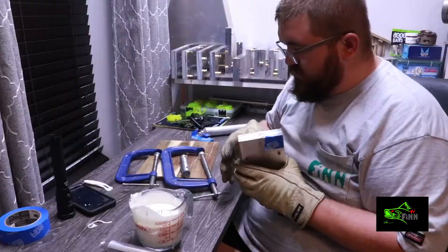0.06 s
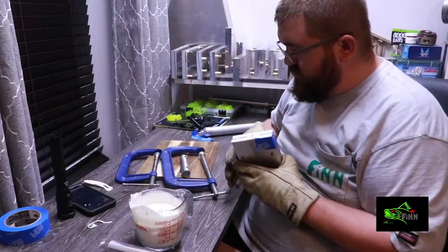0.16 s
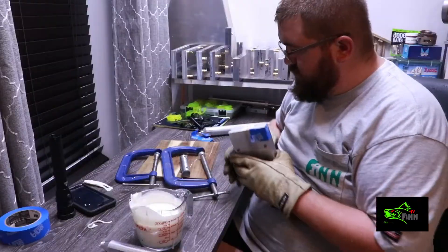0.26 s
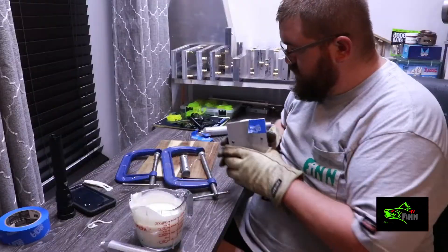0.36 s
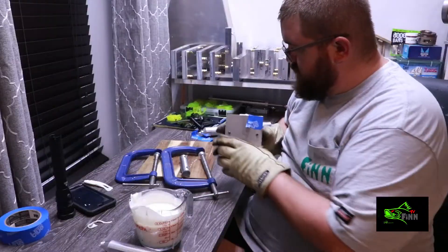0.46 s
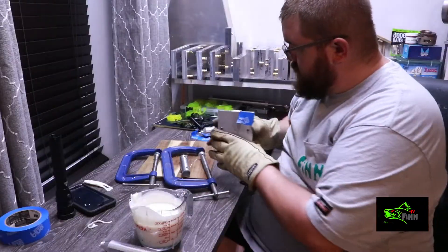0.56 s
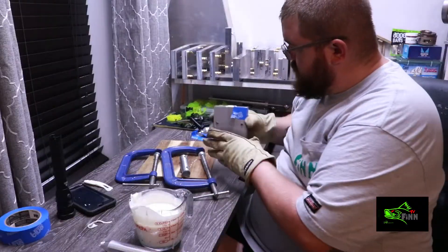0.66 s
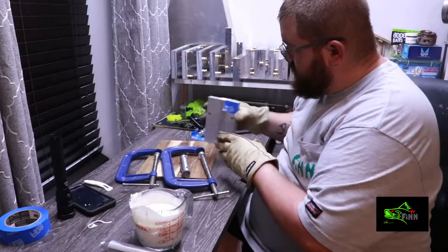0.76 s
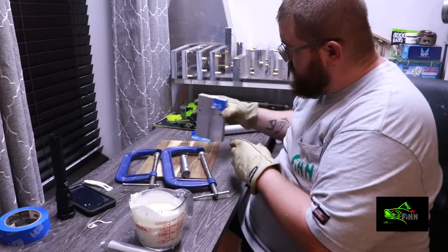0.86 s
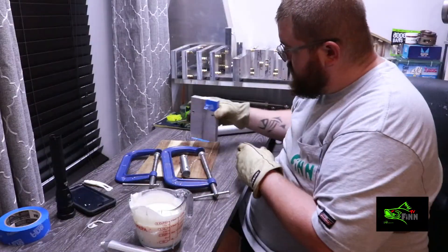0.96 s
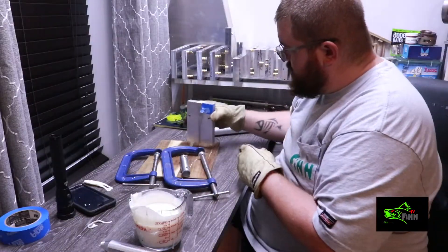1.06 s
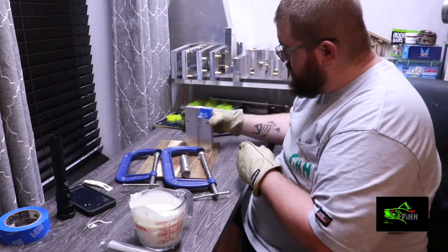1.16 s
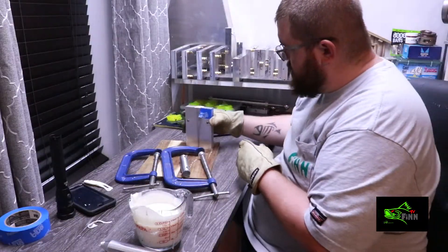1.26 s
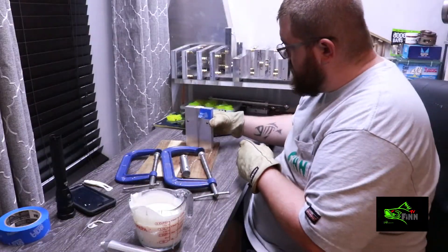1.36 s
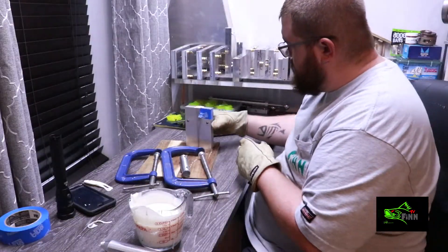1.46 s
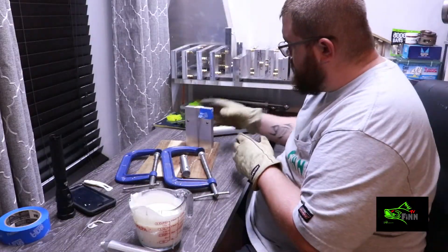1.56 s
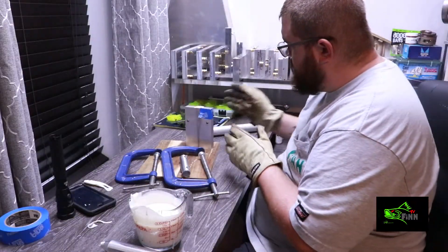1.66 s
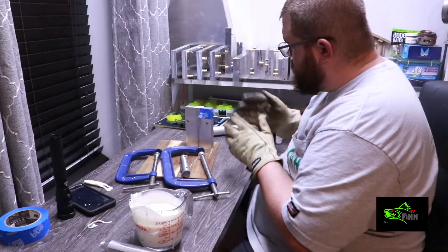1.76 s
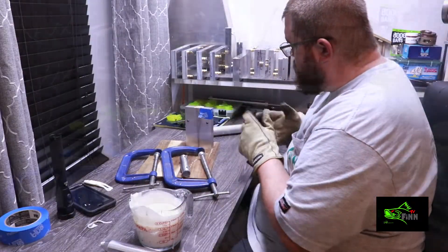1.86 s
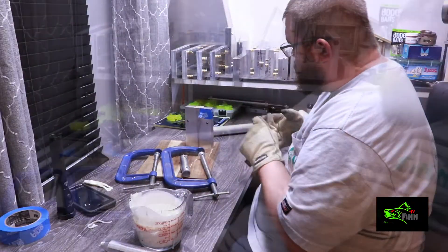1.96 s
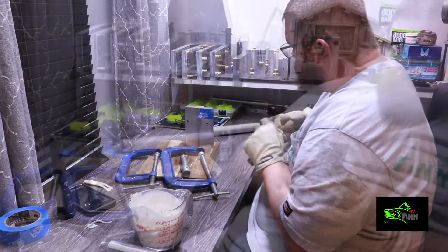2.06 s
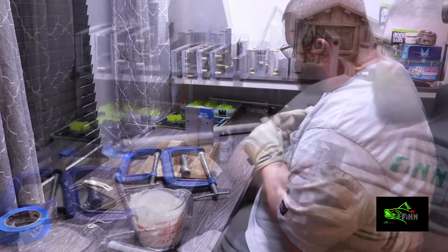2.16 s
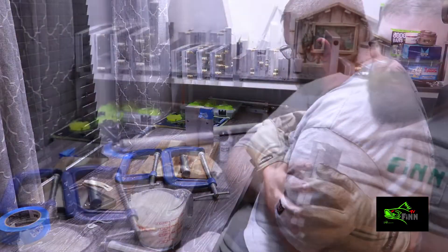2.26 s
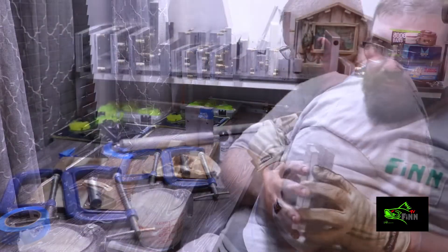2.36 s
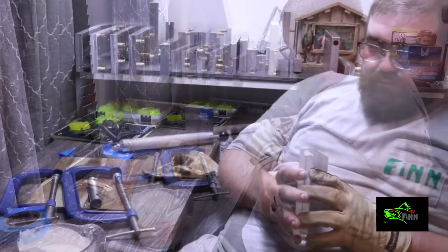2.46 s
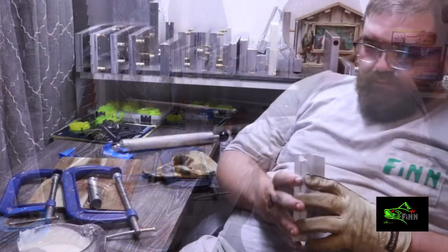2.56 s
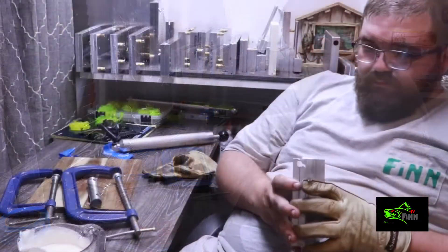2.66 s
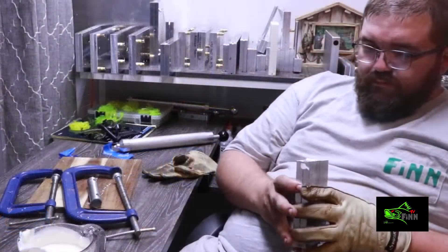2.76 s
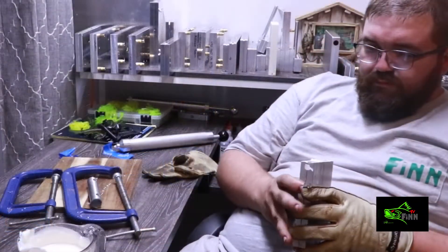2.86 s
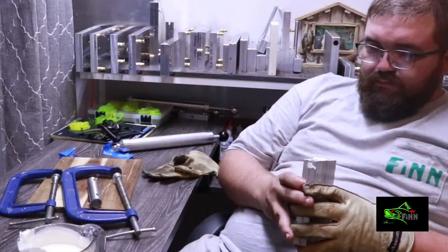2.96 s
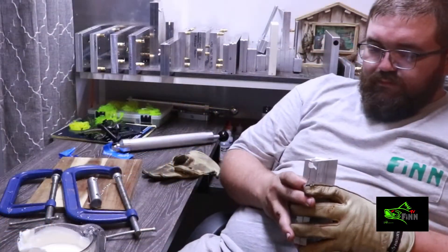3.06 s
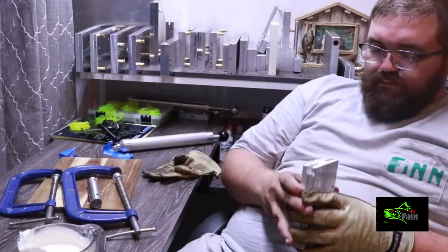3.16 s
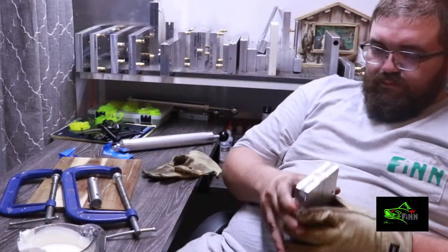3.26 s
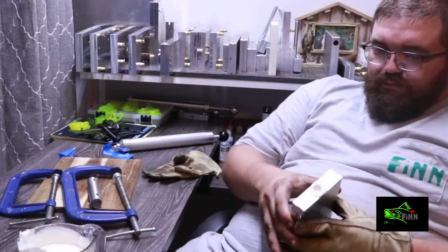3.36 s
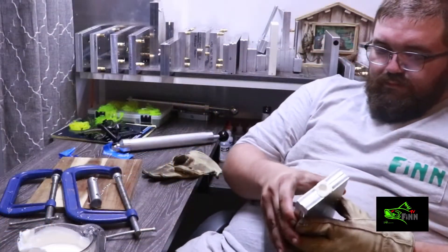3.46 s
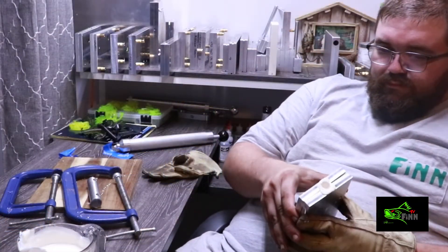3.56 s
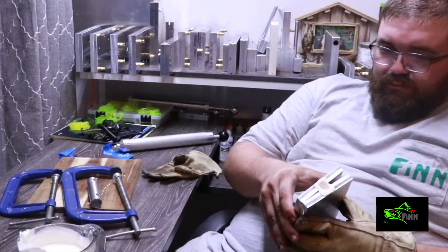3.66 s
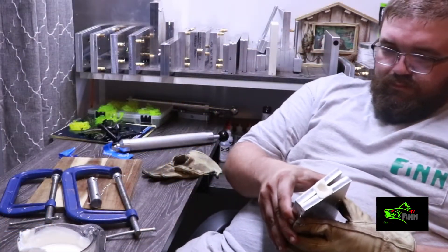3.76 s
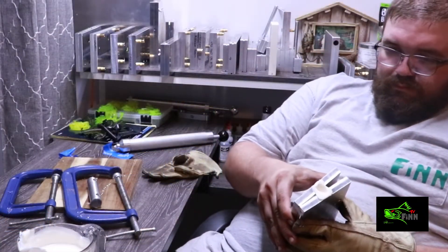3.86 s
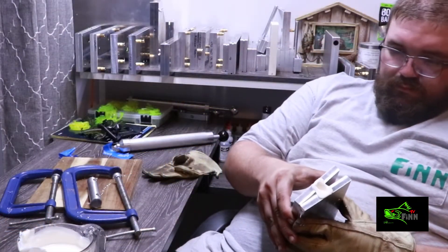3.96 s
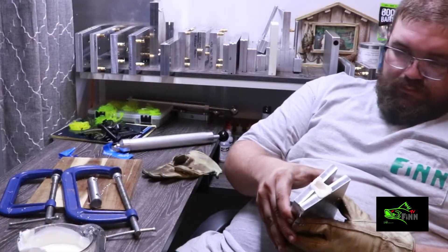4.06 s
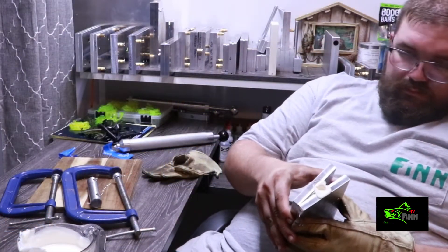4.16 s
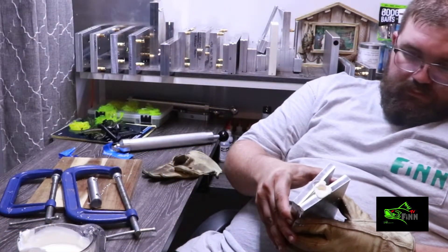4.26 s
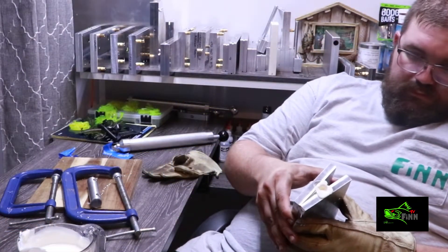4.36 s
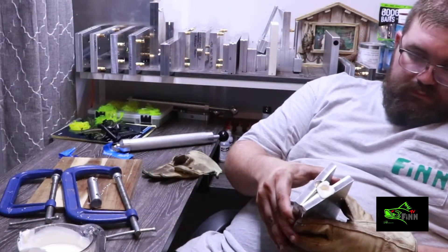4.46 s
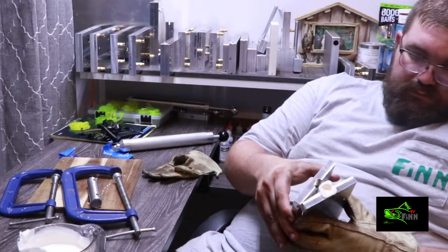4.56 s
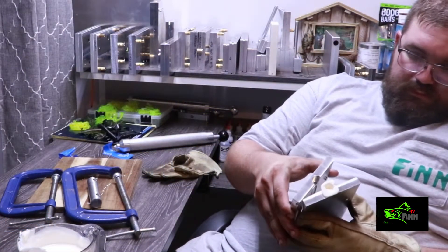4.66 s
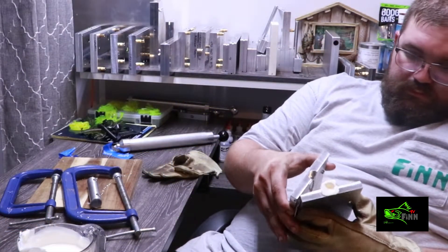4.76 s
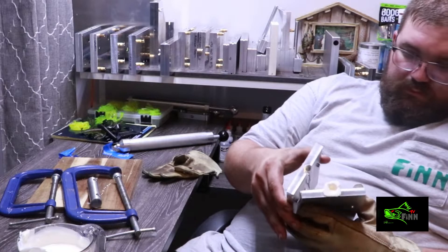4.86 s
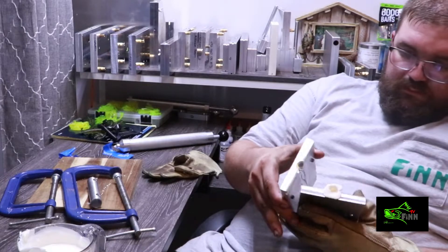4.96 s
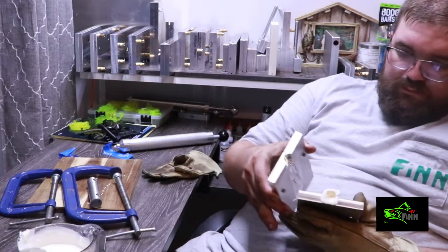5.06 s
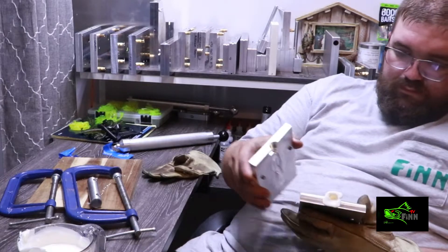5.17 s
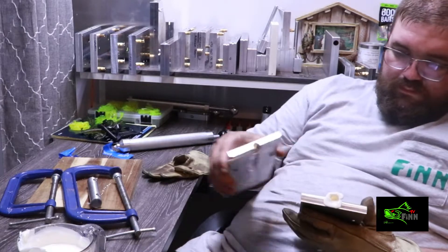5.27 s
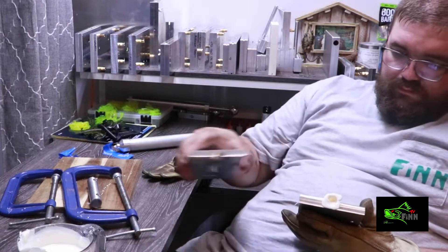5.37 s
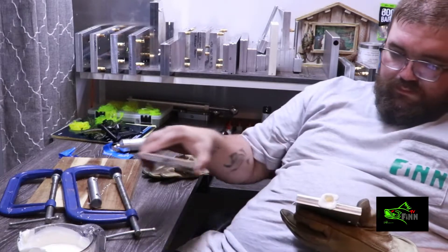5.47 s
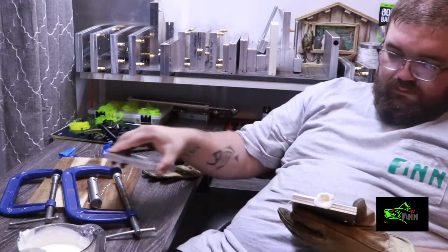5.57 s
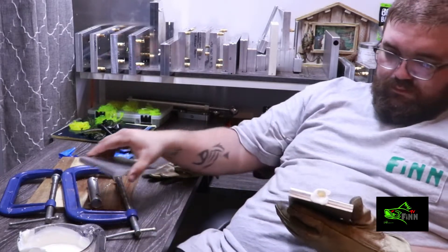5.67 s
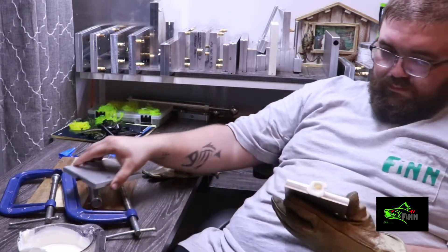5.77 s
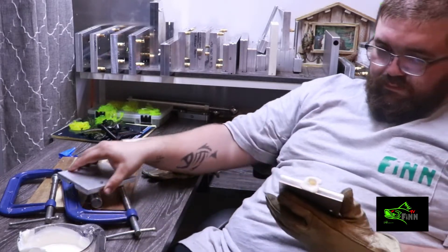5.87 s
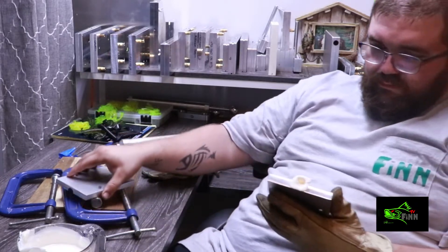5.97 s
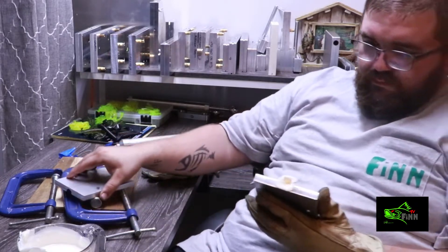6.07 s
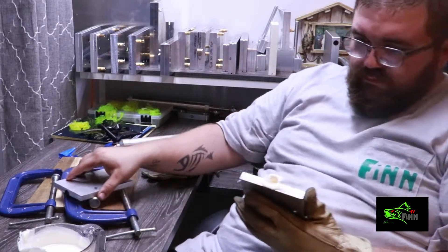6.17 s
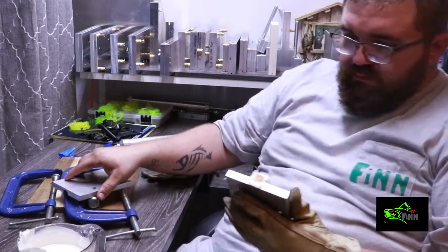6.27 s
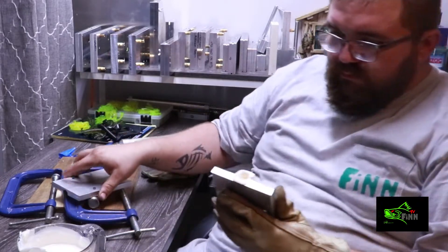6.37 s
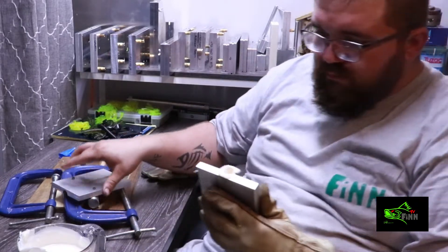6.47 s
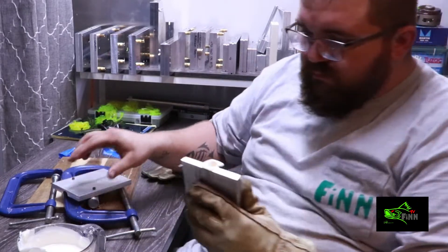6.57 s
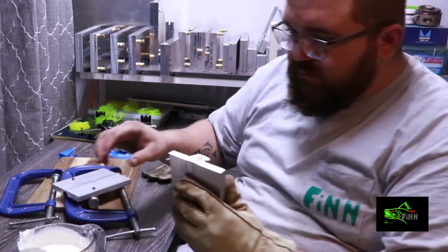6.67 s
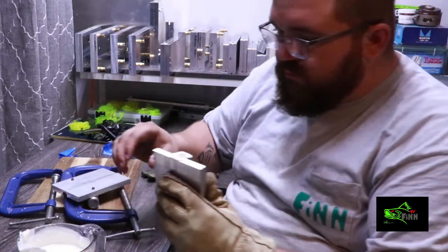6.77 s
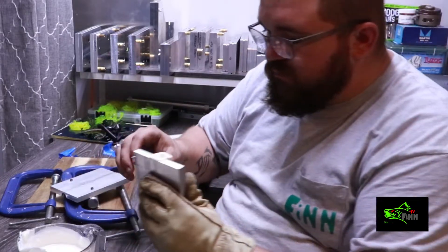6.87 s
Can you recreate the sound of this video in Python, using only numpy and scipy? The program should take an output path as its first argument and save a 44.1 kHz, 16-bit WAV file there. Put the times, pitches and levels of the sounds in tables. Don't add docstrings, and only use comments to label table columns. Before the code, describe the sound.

Ventilation hum and hiss run throughout, with soft low rumbles as the bench shifts. Light taps lead to one hard, distorted wooden slap with a quick rattle, then leather friction from a glove coming off. Small metal ticks and slipping squeaks end in a crisp click. Finally an aluminium piece touches a clamp, lands with bright ringing, clatters again and gets a faint nudge. Close microphone, short room reverberation.

```python
import sys
import numpy as np
from scipy import signal
from scipy.fft import rfft, irfft, next_fast_len
from scipy.io import wavfile
from scipy.ndimage import uniform_filter1d, map_coordinates

SR = 44100
rng = np.random.default_rng(int(sys.argv[2]) if len(sys.argv) > 2 else 0)


def int16_out(signal):
    q = np.round(np.clip(np.atleast_2d(signal).T, -1, 1) * 32767)
    wavfile.write(sys.argv[1], SR, q.astype(np.int16))


def attenuation_scalar(level_db):
    decades = np.asarray(level_db, float) / 20
    return 10 ** decades


N = 305127
T = np.arange(SR // 3) / SR


def unit(x):
    return x / np.sqrt(np.mean(x ** 2) + 1e-20)


def along(points, hz):
    f, v = np.transpose(points)
    return np.interp(np.log(hz + 1), np.log(f + 1), v)


def wobble(rate):
    knots = rng.standard_normal(int(N / SR * 400) + 4)
    return map_coordinates(knots, [np.arange(N) * rate / SR])


def noise(gain, size):
    m = next_fast_len(size)
    spectrum = rfft(rng.standard_normal(m)) * gain(np.fft.rfftfreq(m, 1 / SR))
    return unit(irfft(spectrum, m)[:size])


def coloured(spectrum, size):
    return noise(lambda hz: attenuation_scalar(along(spectrum, hz)), size)


def resonant(peaks):
    def gain(f):
        return sum(attenuation_scalar(db) * np.abs(f * w / (c * c - f * f + 1j * f * w)) ** 2 for c, w, db in peaks)
    return noise(gain, N)


def gritty(spectrum):
    rate_hz, depth_db = 400, 2.5
    bursts = np.interp(T * rate_hz, np.arange(400), rng.standard_normal(400))
    return unit(coloured(spectrum, len(T)) * attenuation_scalar(depth_db * bursts))


def swells(rows, rest_db):
    middle, half_length, *columns = np.transpose(rows)[:, :, None]
    t = np.arange(0, N + 64, 64) / SR
    bell = np.exp(-2 * ((t - middle) / half_length) ** 2)
    curves = []
    for level_db, rest in zip(columns, rest_db):
        power = attenuation_scalar(2 * rest) + np.sum(attenuation_scalar(2 * level_db) * bell, axis=0)
        curves.append(np.interp(np.arange(N) / SR, t, np.sqrt(power)))
    return curves


def dying(t60, attack):
    return attenuation_scalar(-60 * T / t60) * (1 - np.exp(-T / attack))


def ring(modes, attack, rough, scatter_db, since=0):
    steady_hz = 900
    out = np.zeros(len(T))
    for hz, db, t60 in modes:
        knots = rng.standard_normal(200) + 1j * rng.standard_normal(200)
        waver = np.interp(T * 220, np.arange(200), knots)
        depth = rough * min(1, hz / steady_hz) ** 2
        tone = np.imag((1 + depth * waver) * np.exp(2j * np.pi * hz * (T + since)))
        out += attenuation_scalar(db + scatter_db * rng.normal()) * tone * dying(t60, attack)
    return out


def add(track, s, sound):
    track[round(s * SR):][:len(sound)] += sound


def shop(sound, wet_db):
    # (frequency [Hz], t60 [s])
    room_decay = [(100, 0.33), (500, 0.18), (3000, 0.21), (12000, 0.15)]
    hz, t, z = signal.stft(rng.standard_normal(len(T)), SR, nperseg=256)
    decay = attenuation_scalar(-60 * t / along(room_decay, hz)[:, None])
    tail = signal.istft(z * decay, SR, nperseg=256)[1]
    late = np.pad(tail / np.linalg.norm(tail), (round(.004 * SR), 0))
    return sound + attenuation_scalar(wet_db) * signal.fftconvolve(sound, late)[:len(T)]


def knock(contacts, modes, spectrum, noise_db, t60, wet_db, rough, attack):
    out = np.zeros(N + SR)
    for s, db in contacts:
        body = ring(modes, attack, rough, scatter_db=1.5, since=s - contacts[0][0])
        burst = attenuation_scalar(noise_db) * gritty(spectrum) * dying(t60, attack=0.00048)
        add(out, s, attenuation_scalar(db) * shop(body + burst, wet_db))
    return out[:N]


def air():
    # (frequency [Hz], level [dB per Hz])
    flow = [(29, -33), (50, -4), (148, -2.5), (193, -2), (239, 2.5), (297, 0), (387, -1.5), (447, -6),
            (543, -9.5), (900, -15.5), (1350, -21), (2860, -19), (4740, -21), (14700, -23), (15800, -29)]
    return attenuation_scalar(-54 + 0.67 * wobble(rate=2.5)) * coloured(flow, N)


def stand():
    # (frequency [Hz], level [dB per Hz])
    response = [(8, -26.5), (18, 7.5), (30, 3.5), (50, -4.5), (90, -26), (200, -62.5)]
    # (middle [s], half length [s], level [dB])
    lurches = [(0.07, 0.073, -49.5), (0.32, 0.028, -33.5), (0.4, 0.044, -41.5), (0.6, 0.18, -46.5),
               (0.83, 0.11, -44), (1.17, .04, -41.5), (1.3, .05, -47), (1.44, 0.076, -48),
               (1.95, 0.077, -51), (2.55, 0.041, -41), (2.75, 0.1, -40.5), (2.96, 0.043, -45),
               (3.07, 0.044, -37.5), (3.16, 0.068, -31.5), (3.3, 0.13, -47), (3.55, 0.11, -52.5),
               (3.83, 0.056, -49.5), (3.99, 0.041, -51.5), (4.11, 0.073, -46), (4.32, 0.19, -50.5),
               (4.83, .05, -55), (5.47, .06, -56), (5.96, 0.08, -44), (6.15, 0.055, -52), (6.31, 0.06, -30),
               (6.53, 0.097, -52.5), (6.69, 0.052, -60)]
    sway = coloured(response, N)
    swing = np.sqrt(np.abs(uniform_filter1d(sway ** 2, size=SR // 12)) + 0.16)
    return swells(lurches, [-70])[0] * sway / swing


def glove():
    # (frequency [Hz], level [dB per Hz])
    leather = [(530, -35), (900, -7), (1390, -5), (1490, -6), (2650, -8), (5240, -11.5), (9000, -27),
               (13000, -29), (15800, -33)]
    # (centre [Hz], width [Hz], level [dB])
    cavity = [(850, 370, 0), (644, 33, -7)]
    # (middle [s], half length [s], hiss level [dB], hollow level [dB])
    strokes = [(0.36, 0.16, -53.5, -57.5), (0.58, 0.11, -57.5, -64), (0.95, .2, -65, -76),
               (1.45, 0.16, -59, -61.5), (1.75, .04, -57, -58), (1.92, 0.1, -55.5, -58),
               (2.168, .035, -46.5, -45.5), (2.26, 0.04, -57.5, -54.5), (2.4, 0.058, -51, -49),
               (2.56, 0.058, -53.5, -52.5), (3.3, 0.12, -58, -68), (3.5, 0.11, -70, -62.5),
               (3.92, 0.23, -64, -63), (4.68, 0.069, -63.5, -75), (5.15, 0.04, -60, -62),
               (5.68, 0.057, -59, -60), (5.85, 0.16, -58, -57.5), (6.45, 0.12, -57, -55),
               (6.85, 0.33, -60.5, -60.5)]
    hiss, hollow = swells(strokes, [-65.5, -65])
    grain = attenuation_scalar(1.5 * wobble(rate=300) + 1.2 * wobble(rate=40))
    body = noise(lambda f: attenuation_scalar(along(leather, f)) / (1 + (f / 5200) ** 6), N)
    fizz = noise(lambda f: attenuation_scalar(along(leather, f)) / (1 + (5200 / (f + 1)) ** 6), N)
    bright = attenuation_scalar(-12.5) * (1000 * hiss) ** 0.28
    return grain * (hiss * (body + bright * fizz) + hollow * resonant(cavity))


def cloth():
    # (middle [s], half length [s], level [dB])
    brush = [
        (6.84, .13, -64),
    ]
    # (centre [Hz], width [Hz], level [dB])
    colour = [(12000, 2500, 0)]
    return swells(brush, [-120])[0] * resonant(colour)


def tap(hz, ring_db, thump_db, bright_db):
    # (frequency [Hz], level [dB per Hz])
    contact = [(180, -54.5), (300, -6.5), (826, -12), (1230, -13), (2850, -12), (5250, -11), (14000, -34.5)]

    def gain(f):
        soft = 1 / (1 + (f / 2600) ** 4)
        hardness = soft + attenuation_scalar(bright_db) * (1 - soft)
        return attenuation_scalar(along(contact, f)) * hardness / (1 + (f / 5600) ** 6)

    tick = noise(gain, len(T))
    note = unit(ring([(hz, 0, 9)], attack=.0002, rough=.9, scatter_db=0))
    bench = [(249.9, thump_db, 0.06), (382, thump_db - 10.5, 0.054)]
    thump = ring(bench, attack=0.0022, rough=0.43, scatter_db=1.5)
    rattle = attenuation_scalar(-6.5 + bright_db / 3) * tick + attenuation_scalar(ring_db - 6.0) * note
    envelope = dying(t60=0.067, attack=0.00078) + .6 * dying(t60=.006, attack=.0002)
    return shop(rattle * envelope + thump, wet_db=-5.5)


def taps():
    # (time [s], peak level [dB], ring [Hz], ring level [dB], thump level [dB])
    hollow_taps = [(0.954, -42, 825, -5.5, -15.5), (1.496, -32.5, 451, -0.5, -5),
                   (1.726, -32.5, 878, -5, -17), (1.821, -39.5, 900, 4, -16.5),
                   (1.844, -46.5, 1026, 3, -10), (3.257, -30, 750, -5, -37), (3.419, -40.5, 458, -10, -3),
                   (3.72, -40.5, 955, -3, -1), (4.328, -47, 1710, 1, -3.5), (4.6083, -38, 850, -9, -17),
                   (4.94, -52, 910, 4.5, -10.5), (6.061, -20, 658, -4, -14), (6.351, -29.5, 670, -1, -26),
                   (6.484, -40, 666, -2, -26), (5.887, -41, 330, 0, 3), (6.869, -37.5, 346, 3, 1),
                   (3.5, -50, 160, 9.5, -4)]
    # (time [s], peak level [dB], ring [Hz], ring level [dB], thump level [dB])
    bright_taps = [(0.245, -47, 3080, -1, 8), (0.288, -39.5, 2490, -10, 3), (0.3807, -36.5, 3220, -9, 4),
                   (0.5433, -42, 2290, -4.5, -14), (0.6407, -41.5, 2480, -17, -10),
                   (0.7362, -44.5, 2760, -5, 8), (3.192, -43, 2120, 1, -16), (3.4432, -46, 4800, -4, -8),
                   (3.445, -52, 6700, 0, -9), (3.57, -51, 5970, -4, 1), (3.6647, -46.5, 2240, -5, -11),
                   (4.0371, -39, 2840, -11, 0.5), (4.171, -48, 2815, 1, -5), (4.398, -49, 2094, -2, -6.5),
                   (4.9794, -50, 2250, -2, -10.5), (5.0193, -53, 3760, -2, -9),
                   (5.1796, -49, 2100, -4.5, -9.5), (5.2544, -55, 2030, -8, -9.5)]
    # (time [s], peak level [dB], ring [Hz], ring level [dB], thump level [dB])
    finger_taps = [(0.335, -35.5, 920, 2, -22), (0.717, -45, 450, -2, 14), (1.872, -30, 1114, -6, -8.5),
                   (6.287, -30, 599, 4, -1), (6.309, -28, 1020, -0.5, -11)]
    out = np.zeros(N + SR)
    for rows, bright_db in [(hollow_taps, -5.5), (bright_taps, -4.5), (finger_taps, -8.5)]:
        for s, db, hz, ring_db, thump_db in rows:
            add(out, s, attenuation_scalar(db) * tap(hz, ring_db, thump_db, bright_db))
    return out[:N]


def slips():
    # (middle [s], half length [s], low ring level [dB], high ring level [dB])
    moves = [(3.85, 0.24, -63, -82), (4.04, 0.054, -63, -68), (4.178, 0.013, -77, -55),
             (4.244, 0.021, -68, -60.5), (4.336, 0.021, -60, -85.5), (4.405, 0.024, -61.5, -70),
             (4.51, .02, -66.5, -73.5), (4.66, .05, -66, -63), (4.73, 0.014, -56, -57),
             (4.97, 0.034, -70, -67)]
    # (centre [Hz], width [Hz], level [dB])
    bands = [
        [(1678, 240, -2.5), (2250, 260, -2)],
        [(2760, 56, 0)],
    ]
    low, high = swells(moves, [-120, -120])
    return low * resonant(bands[0]) + high * resonant(bands[1])


def click():
    # (time [s], level [dB])
    parting = [
        (4.7127, -60),
        (4.729, -52.5),
        (4.7495, -29.5),
        (4.768, -47),
    ]
    # (frequency [Hz], level [dB], t60 [s])
    pair = [(914, -2.5, 0.063), (1386, -12, 0.096), (1580, -1, 0.047), (2284, -4.5, 0.16),
            (2656, 2.5, 0.14), (4820, -22, 0.079), (5120, -21.5, 0.13), (6870, -21, 0.08), (7540, -30, .06),
            (9500, -26, .06)]
    # (frequency [Hz], level [dB per Hz])
    snap = [(240, -58), (400, -21), (1260, -11), (1480, -6), (2070, -14), (2670, -7), (3230, -32),
            (10000, -43), (13000, -69), (22000, -120)]
    return knock(parting, pair, snap, noise_db=-0.5, t60=0.057, wet_db=-7.0, rough=0.33, attack=0.00068)


def bump():
    # (time [s], level [dB])
    touch = [
        (5.8865, -11),
    ]
    # (frequency [Hz], level [dB], t60 [s])
    clamp = [(448, -8, 0.03), (870, -12.5, .07), (1012, -9.5, 0.1), (1940, -10, .035), (2564, -21, .07),
             (2900, -13.5, .045), (3280, -7.5, .02), (3650, -12.5, .03), (4156, -27, .09),
             (5400, -14, 0.011)]
    # (frequency [Hz], level [dB per Hz])
    scuff = [(120, -54.5), (200, -25), (322, -16.5), (950, -6), (1400, -19.5), (2000, -9.5), (3500, -10),
             (4400, -21.5), (10000, -47), (22000, -120)]
    return knock(touch, clamp, scuff, noise_db=2, t60=0.045, wet_db=-4, rough=.6, attack=0.0004)


def half():
    # (frequency [Hz], t60 [s], first landing [dB], second landing [dB], nudged [dB])
    half_modes = [(140, 0.11, -36.5, -24.5, -16), (310.3, .25, -36, -38, -26), (347, .2, -27, -22, -13.5),
                  (670, 0.1, -27, -12, 1), (907.6, 0.096, -36, -12.5, -32), (1018, 0.084, -30, -21, -30),
                  (1087, .13, -25, -38, -32), (1221, .11, -22, -20, -28), (1410, 0.11, -33, -13, -26),
                  (1600, .08, -26, -12, -14), (2256.6, .13, -15, -1, -16), (2290, 0.1, -10.5, -4.5, -1),
                  (2557, 0.085, -30, -6, -23), (2625, 0.16, -13, -9, -14), (2850, 0.12, -30, -15, -18),
                  (3005, .1, -29, -15, -24), (3553, .08, -26, -24, -13), (4065, 0.068, -18, -28, -8),
                  (4995, .085, .5, -11, -14), (5170, 0.06, -14, -9, -26), (6360, 0.1, -19, -12, -18),
                  (6659, 0.07, -3, -12, -35), (6700, 0.09, -12, -9, -33), (7540, .08, -29, -26, -40),
                  (7930, .035, -22, -40, -45.5), (9210, 0.093, -13, -19, -30), (9383, 0.075, -24, -19, -40),
                  (10600, 0.065, -26, -27, -38), (13600, 0.13, -29, -38, -45), (14600, 0.3, -40, -58, -55)]
    # (time [s], ring level [dB], clatter level [dB], freedom to ring [t60 factor], tilt [dB per octave])
    blows = [
        [(5.9962, 5, -4.5, 0.37, 0.5), (6.0015, -2, -10, 0.52, 0), (5.998, -13, -19, 1.6, .5),
         (6.061, -38, -23.5, .5, -5.5)],
        [(6.1405, -9.5, -17, 0.45, 0), (6.1435, -3.5, -10.5, 0.38, 0), (6.149, -6, -10, 0.41, 4.5),
         (6.157, -15, -16, 0.34, 8.5), (6.175, -15.5, -30, 0.43, -1), (6.144, -21, -36, 1.75, 3.5)],
        [(6.866, -43, -29.5, 0.5, 3.5), (6.87, -24.5, -29, 0.45, 0.5), (6.886, -37, -37, 0.55, -3)],
    ]
    # (frequency [Hz], level [dB per Hz])
    clatters = [
        [(88, -51.5), (150, -22), (1160, -10), (2580, -11), (4450, -22), (6800, -17), (7600, -34), (15800, -52)],
        [(59, -57), (100, -26.5), (1380, -7.5), (1900, -24), (2700, -8), (4250, -22.5), (6700, -22),
         (12000, -52)],
        [(59, -39), (100, -20.5), (698, -3), (952, -9.5), (2090, -12), (2320, -13), (3160, -9.5), (14000, -44)],
    ]
    out = np.zeros(N + SR)
    for k, contacts in enumerate(blows):
        for s, ring_db, clatter_db, free, tilt_db in contacts:
            modes = [(hz, db[k] + tilt_db * np.log2(hz / 2600), free * t60) for hz, t60, *db in half_modes]
            metal = ring(modes, attack=.0004, rough=.14, scatter_db=1, since=s - contacts[0][0])
            clatter = gritty(clatters[k]) * dying(t60=0.046, attack=0.0005)
            add(out, s, shop(attenuation_scalar(ring_db) * metal + attenuation_scalar(clatter_db) * clatter, wet_db=-10.5))
    return out[:N]


def bang():
    # (time [s], level [dB])
    hits = [
        (1.1415, 12.5),
        (1.146, 5),
        (1.158, 1),
        (1.186, -9),
    ]
    # (frequency [Hz], level [dB], t60 [s])
    board_modes = [(85.6, -13.5, 0.11), (132.6, -16, 0.11), (222, -19, .16), (264.8, -11, .17),
                   (299.6, -11, 0.16), (355.6, -12, .15), (380, -12, 0.16), (488.5, -11, 0.1),
                   (670, -13, 0.12), (783, -8, 0.051), (818, -5, 0.045), (977, -14, .055),
                   (1095, -19.5, .16), (1658, -4, 0.035), (1803, -12, .055), (2080, -6, .06),
                   (2290, -10, 0.07)]
    # (frequency [Hz], level [dB], t60 [s])
    mould_modes = [(3025, 17, 0.057), (3410, 13, .06), (3747, 15, .115), (5580, 8, .07), (6050, 12, .09),
                   (6740, -1, .22), (7440, -2, .12), (8340, -6, 0.15), (8979, -9, 0.18), (10860, -1, 0.066),
                   (11900, -12, .12), (12540, -9, 0.16), (13120, -8, 0.13), (13440, -5, 0.12)]
    # (frequency [Hz], level [dB per Hz])
    slap = [(59, -39), (110, -14), (185, -22), (321, -4), (544, -10.5), (832, -6), (1300, -11.5),
            (1780, -9), (5030, -24.5), (5840, -23), (7850, -33), (13600, -42), (15800, -62)]
    board = knock(hits, board_modes, slap, noise_db=3, t60=.075, wet_db=-8, rough=.9, attack=0.0017)
    mould = knock(hits, mould_modes, slap, noise_db=-60, t60=0.0498, wet_db=-7.0, rough=.5, attack=.002)
    return board + attenuation_scalar(-31) * mould


def scene():
    background = air() + stand()
    hands = glove() + cloth() + taps()
    metal = slips() + click() + attenuation_scalar(-8.0) * bump() + half()
    return (background + hands + metal + attenuation_scalar(-10.5) * bang())[None]


def low_pass(x):
    return signal.sosfilt(signal.butter(12, 15950, fs=SR, output="sos"), x)


def record(dry):
    clipped = dry / (1 + np.abs(dry) ** 12) ** (1 / 12)
    highpass = signal.butter(8, 15900, "high", fs=SR, output="sos")
    spill = signal.sosfiltfilt(highpass, clipped)
    return low_pass(clipped - .6 * spill)


dry = scene()
out = record(dry)
int16_out(out)
```